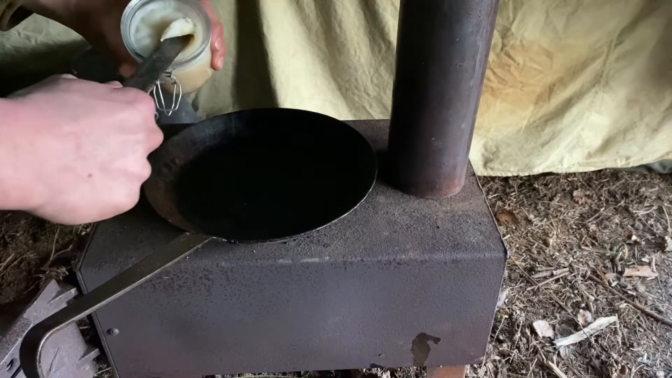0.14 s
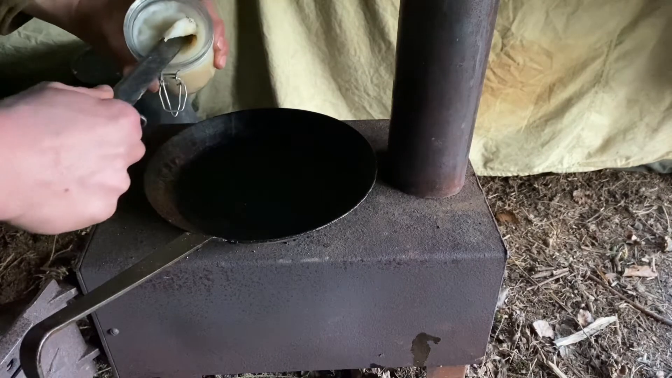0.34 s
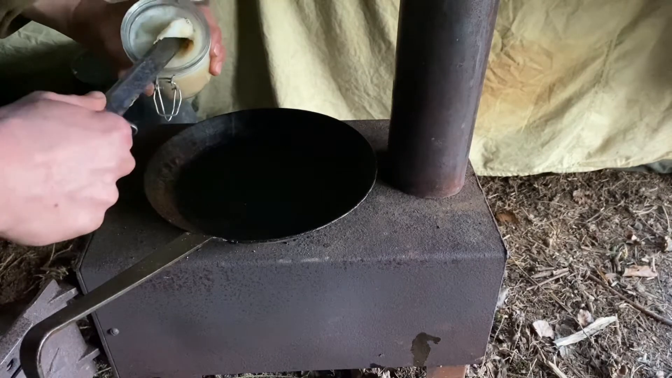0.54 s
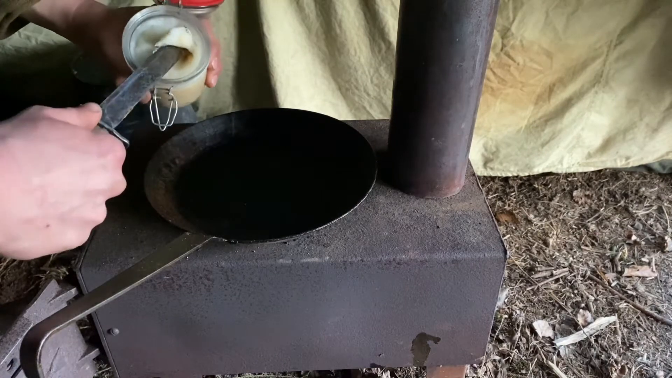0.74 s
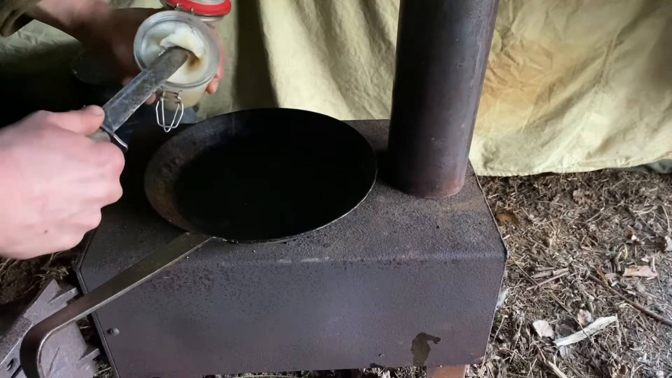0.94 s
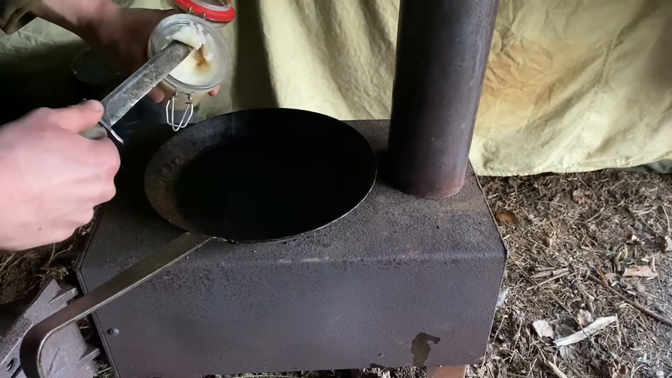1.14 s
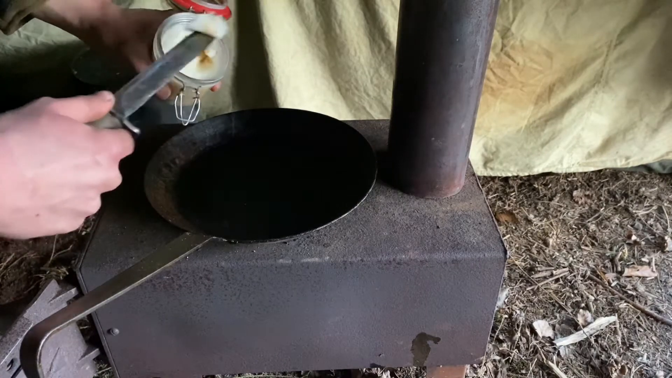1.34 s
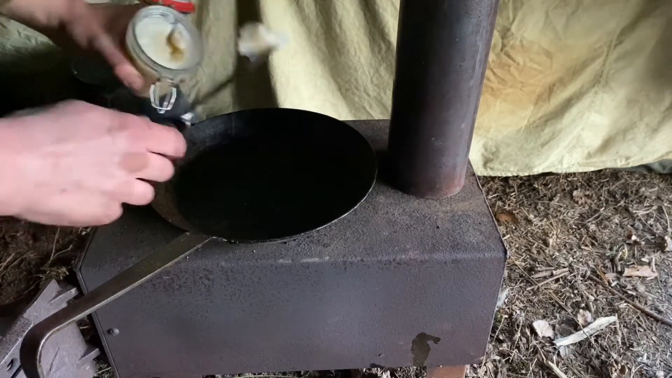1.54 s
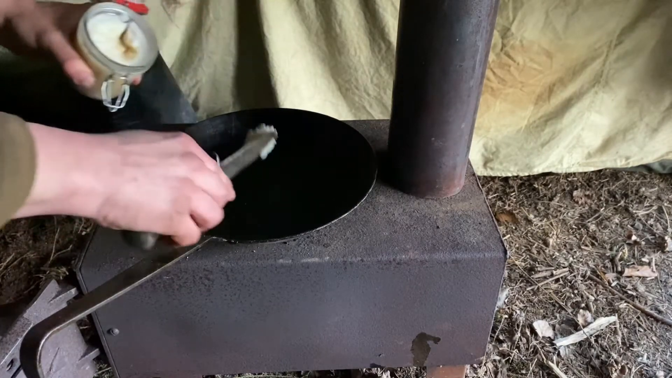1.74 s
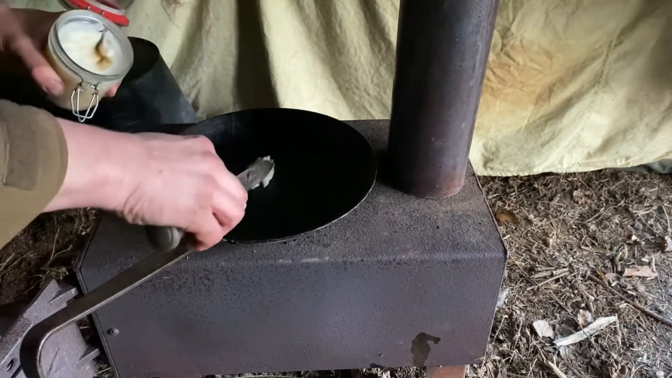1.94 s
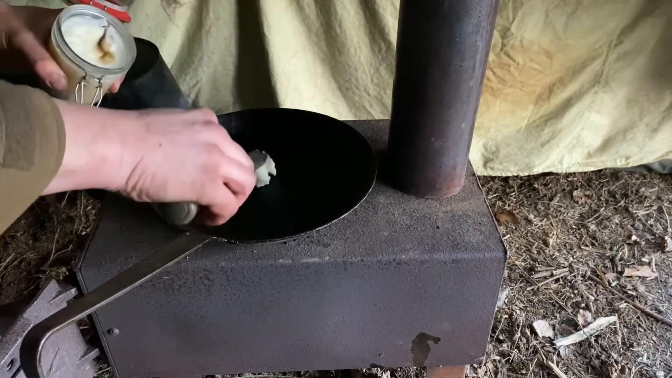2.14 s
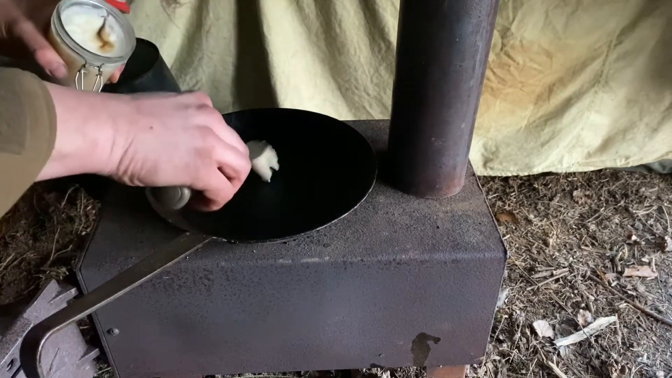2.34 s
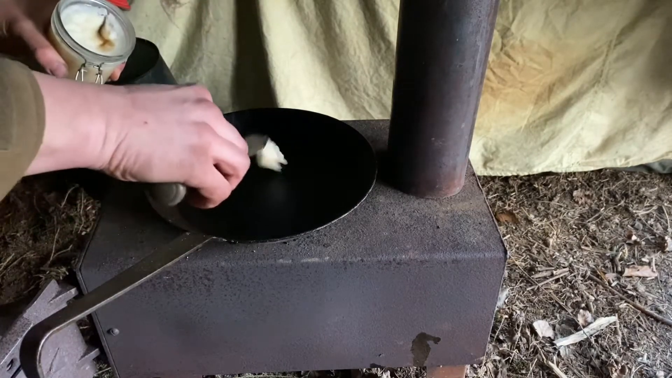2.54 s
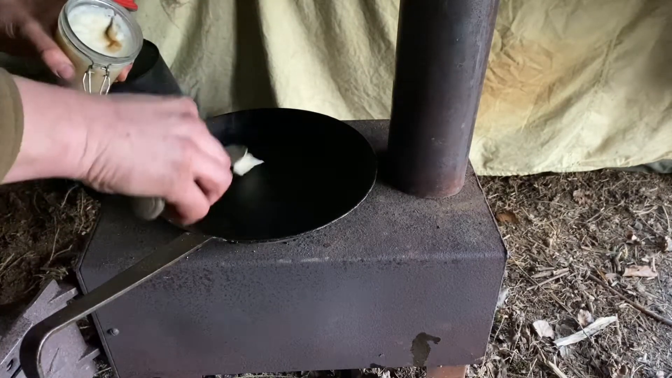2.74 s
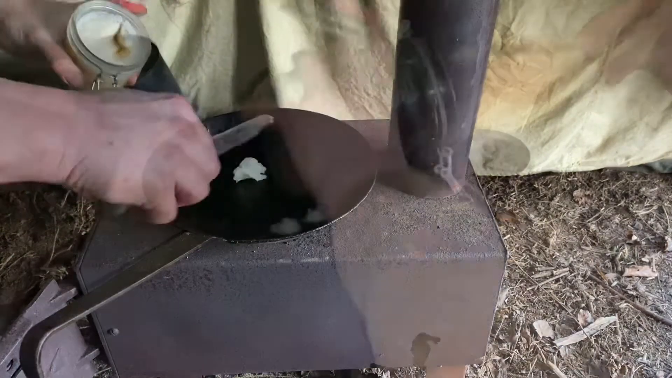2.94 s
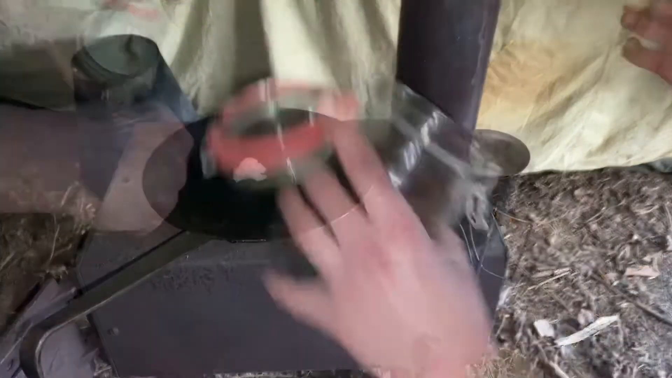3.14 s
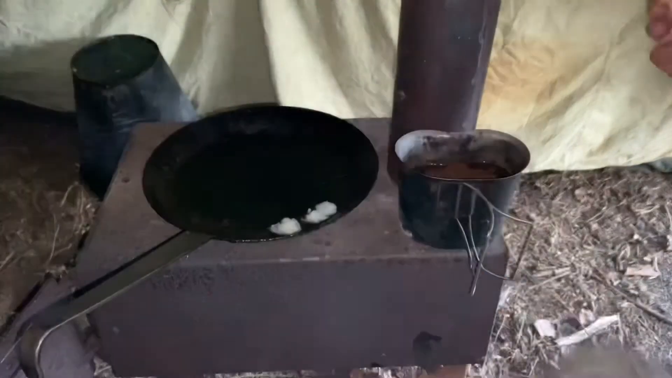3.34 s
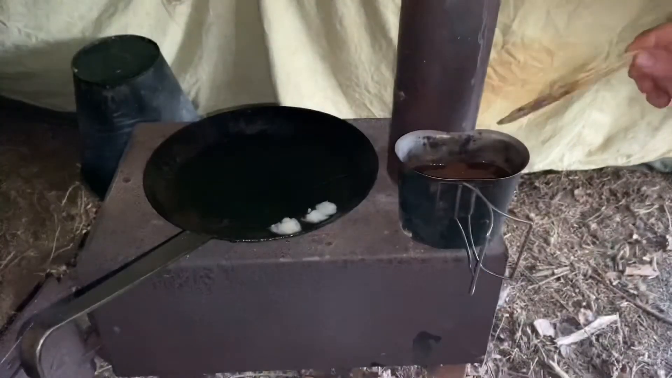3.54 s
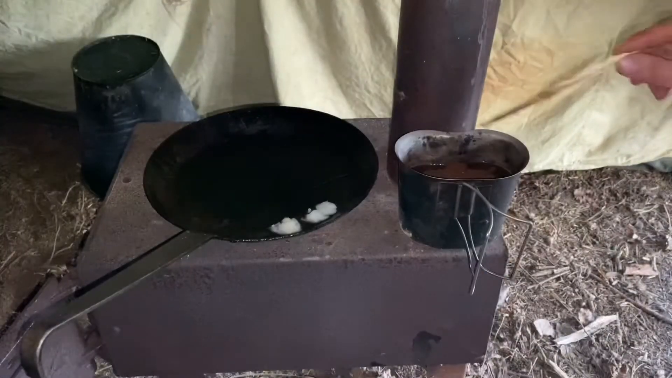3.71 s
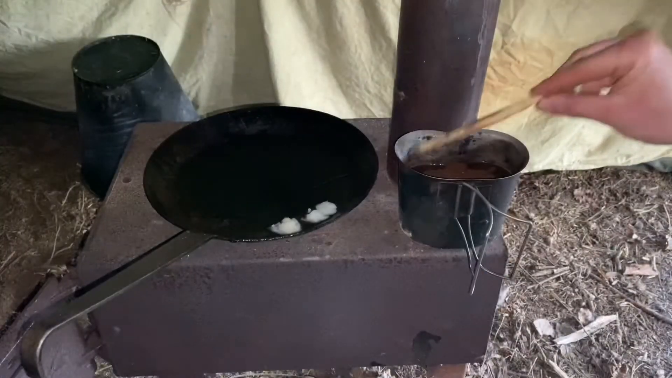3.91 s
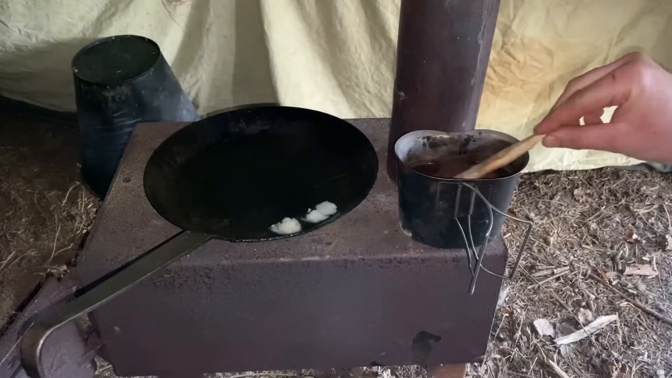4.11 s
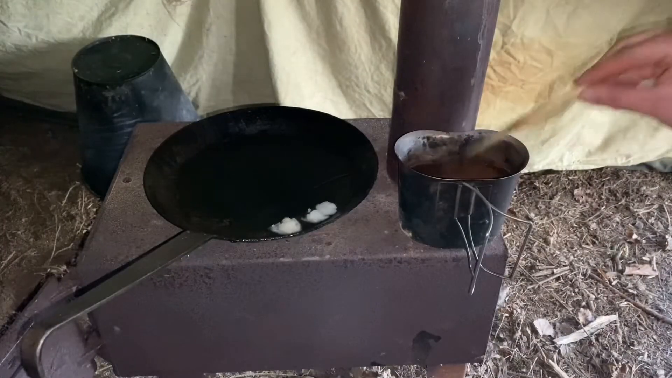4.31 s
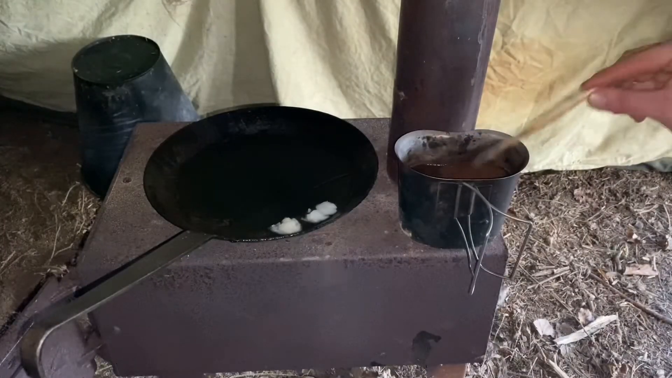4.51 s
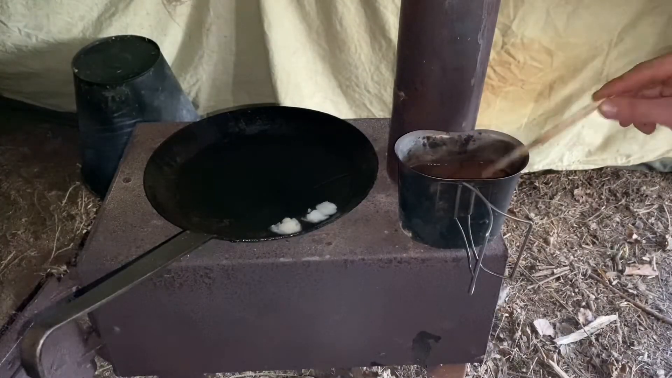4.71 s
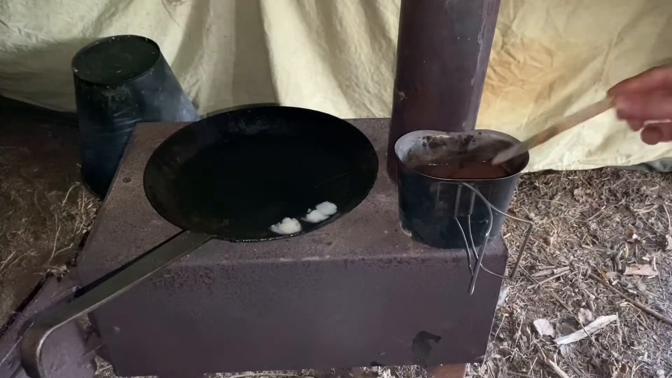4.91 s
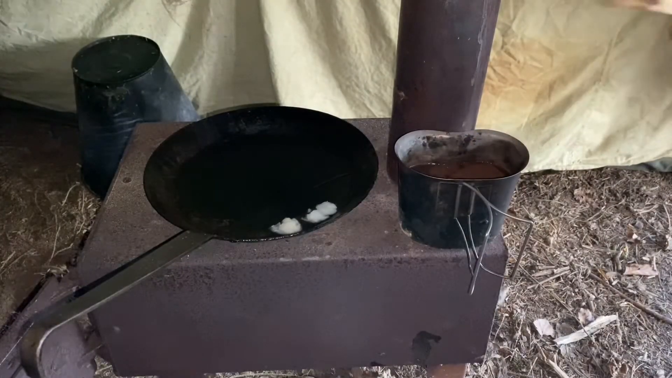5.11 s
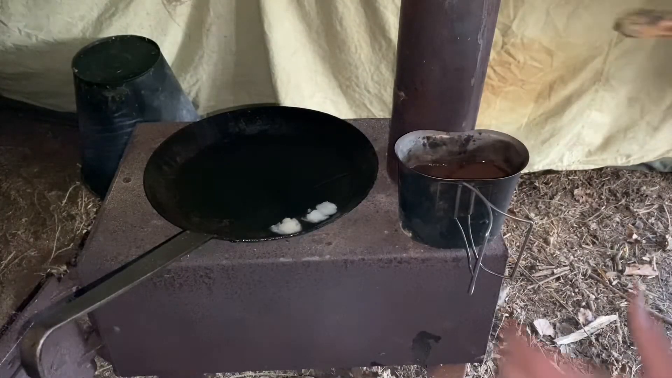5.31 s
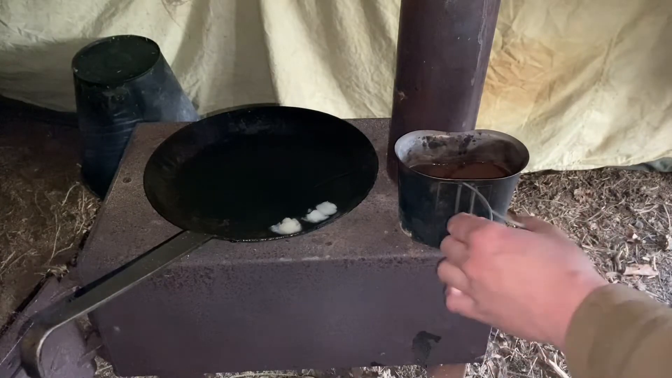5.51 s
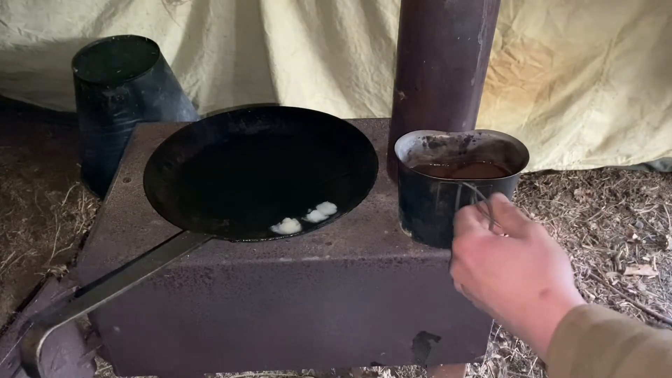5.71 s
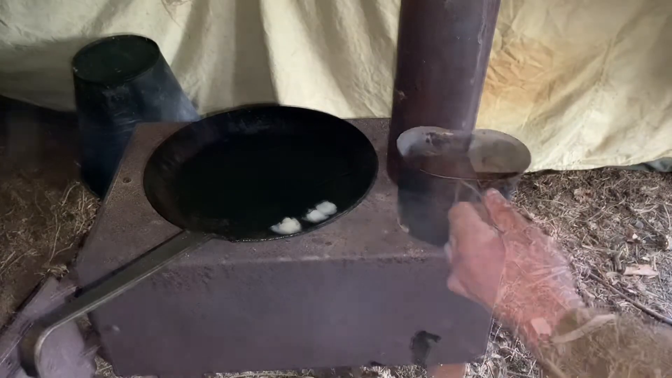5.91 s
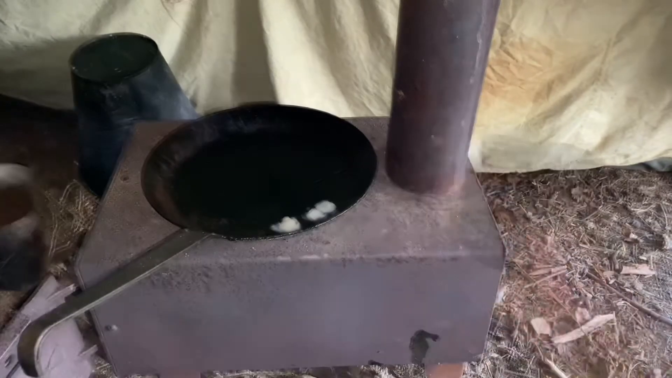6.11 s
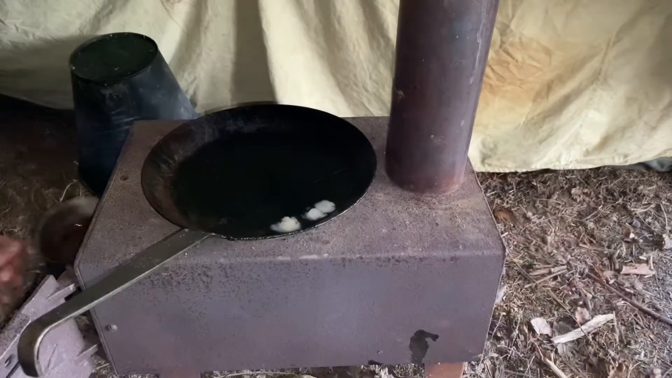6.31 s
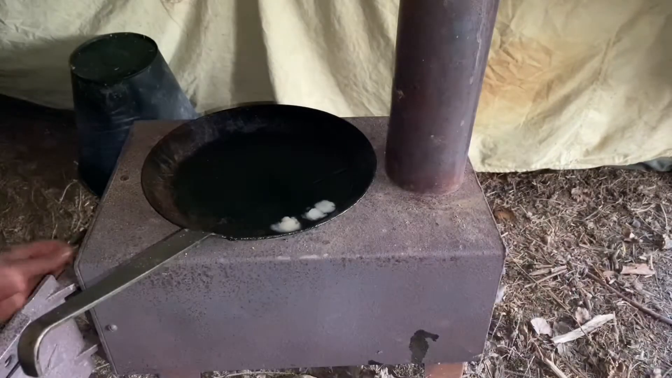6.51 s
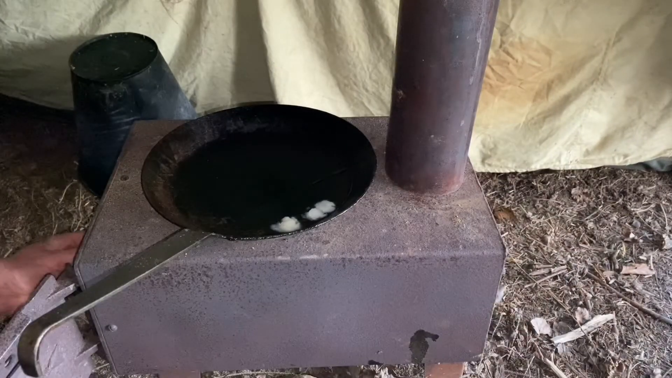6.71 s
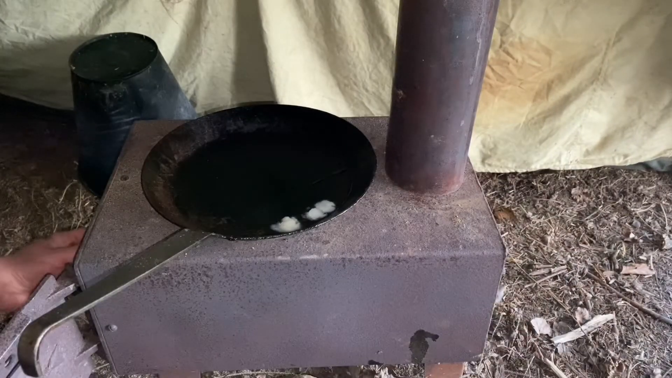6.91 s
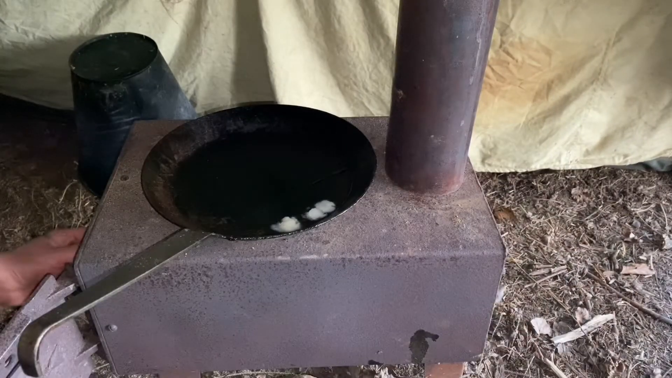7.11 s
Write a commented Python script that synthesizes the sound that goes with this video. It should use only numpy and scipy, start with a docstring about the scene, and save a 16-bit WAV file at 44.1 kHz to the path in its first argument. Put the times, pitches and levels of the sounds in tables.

```python
"""Canvas tent with a sheet-steel stove, someone cooking. Knocks on and near the stove, a spoon on a mug and a jar's
wire clasp ring as damped modes plus noise bursts; things pushed over the steel shake it by stick and slip.
A knife touches a steel pan and scrapes fat into it: struck, then rubbed pan modes. The fire ticks (noise bursts)
and rumbles; sleeves rustle and a thin hiss lies under all (shaped, patchy noise); thin sagging sines whistle faintly."""
import sys
import numpy as np
from scipy import signal
from scipy.fft import rfft, irfft, next_fast_len
from scipy.io import wavfile
from scipy.ndimage import uniform_filter1d, map_coordinates

SR = 44100
rng = np.random.default_rng(int(sys.argv[2]) if len(sys.argv) > 2 else 0)


def inscribe(sig):
    """Save sig as 16-bit PCM at rate SR to the path in sys.argv[1].

    A 1-D sig is mono; a 2-D sig holds one channel per row.
    Samples are clipped to [-1, 1] before scaling.
    """
    pcm = np.round(np.clip(np.atleast_2d(sig).T, -1, 1) * 32767)
    wavfile.write(sys.argv[1], SR, pcm.astype(np.int16))


N = 315393

# Knocks and thuds on and near the stove. Each row: start in seconds, level in dB, pitch in Hz, second mode in Hz,
# stove ring in dB, snap in dB, chatter in seconds, left over right in dB.
KNOCKS = [(0.825, -50, 298, 577, -50, -28, 0.0073, 6), (3.738, -12, 1520, 2800, -34.5, -40.5, 0.0023, 0.5),
          (3.743, -29, 1350, 1060, -19.5, -28.5, 0.0051, -4),
          (3.889, -16, 1345, 2890, -47, -14, 0.0063, -5.5), (3.892, -10, 1945, 4000, -54, -24.5, 0.003, 7),
          (5.533, -29.5, 1500, 2730, -32, -2.5, 0.013, 1), (5.635, -41, 1120, 2550, -27, -9, 0.011, -3),
          (5.648, -35, 930, 656, -17.5, -15, 0.013, -3), (5.667, -37, 730, 2740, -25, -3, 0.01, -3),
          (5.707, -37.5, 1510, 2960, -19.5, -3.5, 0.0084, -2.5),
          (5.76, -35, 236, 163, -31.5, -44.5, 0.0058, -4.5), (5.779, -38.5, 220, 150, -36, -37, 0.0036, -2),
          (6.345, -46.5, 596, 1990, -6, -3.5, 0.0071, 7), (6.368, -19.5, 603, 930, -25.5, -25.5, 0.0051, 2),
          (6.373, -22, 164, 321, -44.5, -52, 0.005, 2), (6.404, -29, 109, 302, -32, -45, 0.004, -0.5),
          (6.409, -35, 600, 1910, -33, -24, .008, -4), (6.492, -36.5, 624, 990, -14.5, -37, 0.01, 3),
          (6.511, -31.5, 266, 89, -23.5, -46.5, .012, 2)]
# Modes of the stove's steel sheets. Each row: frequency in Hz, level in dB, unloaded t60 in seconds.
STOVE_MODES = [(152, -4, 0.3), (165, -0.5, 0.29), (218.2, -4.5, 0.35), (294.6, -10.5, 0.466),
               (411, -6, 0.4), (492, -5, 0.39), (546, -3, 0.34), (594, -4.5, 0.27), (620, -9, 0.51),
               (728, -6, 0.25), (811, -1.5, 0.14), (986, -4, 0.17), (1705, -6, 0.13), (1920, -11, 0.037)]
# Spectrum of the stove's dense wash. Each row: frequency in Hz, relative density in dB per Hz.
WASH_SPECTRUM = [(50, -24), (130, -6), (530, 0.5), (1200, -4), (1600, -14.5), (5000, -30), (11000, -65.5)]
# Decay of that wash. Each row: frequency in Hz, t60 in seconds.
WASH_T60 = [(150, 0.25), (600, 0.21), (1500, 0.17), (4000, 0.087)]
# Modes of the mug. Each row: frequency in Hz, level in dB, t60 in seconds.
MUG_MODES = [(1147, 1.5, 0.38), (1165, 1, 0.23)]
# The stove top left humming. Each row: start in seconds, level in dB, favoured pitch in Hz.
HUMS = [(3.76, -42.5, 562), (6.515, -43, 548)]
# Spoon on the mug's rim. Each row: start in seconds, level in dB.
TAPS = [(4.5772, -18), (4.7885, -17.5)]
# Modes of the wooden spoon. Each row: frequency in Hz, level in dB, t60 in seconds.
SPOON_MODES = [(1104, 1, 0.01), (1830, -12, 0.0077), (3830, -22.5, 0.013)]
# Clasp on jar. Each row: start in seconds, level in dB, belly modes in dB, middle modes in dB, top modes in dB,
# rattle in seconds.
CLINKS = [(2.975, -62, 7, 0, -10, 0.03), (3.052, -43, 14, -4, 14.5, 0.0053), (3.055, -34, 8, 13, 5, 0.0047),
          (3.068, -47, -6, -8, -12.5, 0.004), (3.087, -42.5, -6, -4, -4, 0.013),
          (3.162, -47.5, 6, 0, -16, 0.0058), (3.174, -80, -4, 5, 5, 0.0025), (3.238, -65, 5, 7, -1, 0.0062),
          (3.250, -49.5, -1, 9, 2, 0.036), (3.373, -66.5, 6, 6, -16, 0.027),
          (3.510, -61.5, 6, 9, -5, 0.0084), (4.304, -38.5, -8, 5.5, -1, 0.0087),
          (4.357, -56.5, -12, 0, -10, 0.012), (4.437, -53.5, -8, -2, -14, 0.014),
          (4.469, -61.5, -6.5, -3, -7.5, 0.025)]
# Modes of the jar's glass. Each row: frequency in Hz before detuning, level in dB, t60 in seconds.
GLASS_MODES = [(1519, 2, 0.037), (2640, -22, 0.05), (3800, -2.5, 0.035), (4920, -6.5, 0.015),
               (5130, -7, 0.021), (5350, -5, 0.028), (5650, -10, .015), (7480, -12, 0.01),
               (8400, -3, 0.024), (11230, -2, 0.013)]
# Things pushed over steel. Each row: start in seconds, hold in seconds, release t60 in seconds, body in dB,
# grit in dB, singing against the grit in dB.
SLIDES = [(3.74, 0.013, 0.12, -60, -50, -18), (3.783, 0.0068, 0.029, -72, -52, -27),
          (5.621, 0.025, 0.3, -57, -53.5, -27), (5.793, 0.0093, 0.15, -62.5, -64.5, -14),
          (6.346, 0.019, 0.34, -45, -48.5, -18), (6.401, 0.05, 0.36, -51, -63.5, 5.5),
          (6.634, 0.041, 0.1, -68, -71.5, -20)]
# Spectrum of the grating. Each row: frequency in Hz, relative density in dB per Hz.
GRIT_SPECTRUM = [(1000, -26.5), (1900, -2), (2600, -2), (4000, -12), (8000, -11), (13000, -6.5),
                 (16500, -35.5)]
# Singing modes of the scraped steel. Each row: frequency in Hz, level in dB.
SCRAPED_MODES = [(1740, -0.5), (1985, -4.5), (2450, -9.5)]
# Knife on pan. Each row: start in seconds, level in dB, brightness in dB per octave, scrape in seconds.
TOUCHES = [(1.725, -71, 5, 0.02), (1.985, -72, 1, 0.034), (2.294, -68.5, -1, 0.006),
           (2.636, -64.5, 3, 0.008)]
# The blade dragged over the pan. Each row: start in seconds, length in seconds, level in dB.
STROKES = [(1.748, 0.23, -74.5), (2.02, 0.17, -80)]
# Modes of the steel pan. Each row: frequency in Hz, level in dB, t60 in seconds.
PAN_MODES = [(400, 6, 0.08), (577, 8, 0.21), (1060, -9, 0.14), (1660, -14.5, 0.39), (2030, -23, 0.22),
             (4690, -17.5, 0.4)]
# Ticks of the fire. Each row: start in seconds, level in dB, centre in Hz.
TICKS = [(0.317, -52.5, 10700), (0.468, -53, 7500), (0.5706, -52, 10800), (0.6989, -44, 10400),
         (0.7396, -46, 11900), (0.782, -53.5, 11900), (1.0249, -38, 7700), (1.1746, -36, 9200),
         (1.509, -48, 10600), (1.615, -53.5, 3280), (1.836, -48.5, 7500), (2.8431, -45, 11400),
         (3.437, -53, 11260), (4.6718, -46.5, 11230), (4.9073, -47, 4080), (5.1256, -42.5, 10700),
         (6.6118, -56, 4140), (6.641, -53, 11200), (6.942, -52.5, 11800), (7.07, -61.5, 9000)]
# Faint falling whistles. Each row: start in seconds, length in seconds, starting pitch in Hz, level in dB.
WHISTLES = [(0.0, 0.11, 5270, -76.5), (0.105, 0.077, 5180, -77), (.17, .12, 5200, -77)]
# Sleeves sweeping past. Each row: loudest moment in seconds, seconds to rise 10 dB, seconds to fall 10 dB,
# rustle in dB, its treble in dB.
SWISHES = [(0.2, 3, 0.6, -70.5, -76.5), (1.9, 1.25, 1.1, -76, -86), (3.05, 0.07, 0.17, -70.5, -80),
           (3.711, 0.21, 0.02, -62.5, -71), (4.171, 0.4, 0.46, -69.5, -75.5),
           (5.24, 0.21, .5, -62.5, -66.5), (5.921, -0.15, 0.55, -67, -73.5)]
# Spectrum of cloth. Each row: frequency in Hz, relative density in dB per Hz.
RUSTLE_SPECTRUM = [(760, -33), (1300, -8), (1620, -3), (3000, -1), (4590, -4), (5510, -4), (8000, -17.5),
                   (10400, -40.5), (17600, -120)]
# Low noise over time. Each row: time in seconds, rumble of the fire in dB, low-mid murmur that swells after
# blows on the stove in dB.
LOW_NOISE_LEVELS = [(0.0, -69, -73.5), (0.52, -67, -78.5), (3.34, -66, -79), (3.76, -61.5, -63.5),
                    (4.22, -64, -75), (4.62, -63.5, -73.5), (4.74, -60, -66.5), (5.34, -63, -71.5),
                    (5.65, -62, -65), (6.15, -67, -71.5), (6.57, -57, -70), (6.76, -63, -80),
                    (7.15, -69, -79)]
# Spectrum of the fire's draught. Each row: frequency in Hz, relative density in dB per Hz.
RUMBLE_SPECTRUM = [(22, -45.5), (33, -25), (45, -0.5), (59, -1), (100, -4.5), (130, -10), (300, -23.5),
                   (500, -49.5)]
# Spectrum of the low-mid murmur. Each row: frequency in Hz, relative density in dB per Hz.
MURMUR_SPECTRUM = [(120, -33.5), (250, 2), (500, 2), (1000, -7), (1800, -13), (3000, -43)]
# Level of the hiss over time, rising and falling. Each row: time in seconds, level in dB.
HISS_LEVELS = [(0, -71), (1.35, -72.5), (2.7, -70.5), (3.2, -79), (3.95, -75), (4.62, -89.5), (4.86, -67.5),
               (6.25, -78.5), (6.55, -85), (7.15, -86)]
# Spectrum of the hiss. Each row: frequency in Hz, relative density in dB per Hz.
HISS_SPECTRUM = [(2500, -25), (4000, 0), (6000, -5), (8000, 2.5), (11000, 3.5), (14000, 2), (15700, -5.5),
                 (16100, -38.5)]
# Stereo likeness of the noises. Each row: frequency in Hz, left-right correlation.
ALIKE = [(60, 1), (200, 0.76), (500, 0.267), (1200, 0.026), (2500, 0.3), (4000, 0.56), (6000, 0.14),
         (7000, 1), (16000, 0.98)]
# Lean of the noises. Each row: frequency in Hz, left over right in dB.
LEFT_LEAN = [(60, 1), (150, -0.5), (380, 3.5), (950, 0.5), (2380, 5), (5980, 2), (15000, -1.5)]
# Answer of the canvas walls. Each row: frequency in Hz, t60 in seconds.
TENT_T60 = [(300, 0.036), (2000, 0.068), (10000, 0.048)]
# Phase between left and right in the treble, in steps. Each row: frequency in Hz, phase in turns.
STEREO_PHASE = [(0, 0), (7500, 0), (8600, .5), (9500, .5), (10600, 1), (11600, 1), (12800, 1.5),
                (13700, 1.5), (14700, 2), (16500, 2)]

KNOCK_T60_S, DEEPER_LONGER = 0.013, 0.63  # at 1 kHz; power by which deep knocks last longer
OVERTONE_DB = -3.5  # a knocked thing's second mode
MUG_UNDER_STOVE_DB = 23.5  # the mug hums along when the stove is shaken
HUM_FALL_DB_PER_OCTAVE = 70  # loss away from the favoured pitch
TAP_STOVE_DB, TAP_MUG_DB, TAP_SNAP_DB, TAP_PAN_DB = -24.5, -30, -13.5, 2.5
JAR_PAN_DB = 2.5
CLINK_DETUNE = 0.005  # relative; small random detuning of the glass modes at each clink
GRIP_S = 0.017  # a push takes hold
WHISTLE_SAG_HZ_PER_S = 2600
CLOTH_DB = -93.5  # the canvas never rests
TOP_HZ = 16600


def amp(db):
    """Decibels to gain."""
    return 10 ** (np.asarray(db) / 20)


def unit(x):
    """Scaled to rms 1."""
    return x / np.sqrt(np.mean(x ** 2) + 1e-20)


def along(points, hz):
    """Interpolates (Hz, value) points on a log axis."""
    point_hz, values = np.transpose(points)
    return np.interp(np.log(hz + 1), np.log(point_hz + 1), values)


def curves(rows):
    """One value per sample for each column after the time."""
    time_s, *columns = np.transpose(rows)
    return [np.interp(np.arange(N) / SR, time_s, column) for column in columns]


def wobble(rate_hz):
    """A smooth random curve with rate_hz knots a second."""
    knots = rng.standard_normal(int(N * rate_hz / SR) + 4)
    return map_coordinates(knots, [np.arange(N) * rate_hz / SR])


def filtered(x, response):
    """x times a complex response of frequency."""
    n = x.shape[-1]
    size = next_fast_len(n + 8192)
    return irfft(rfft(x, size) * response(np.fft.rfftfreq(size, 1 / SR)), size)[..., :n]


def rush(spectrum, patchy_db):
    """Stereo noise of rms 1 with time-frequency patches of random gain."""
    z = signal.stft(rng.standard_normal((2, N)), nperseg=512)[2]
    patches = uniform_filter1d(rng.standard_normal(z.shape[1:]), size=6, axis=0)
    patches = uniform_filter1d(patches, size=12, axis=1)
    pair = signal.istft(z * amp(patchy_db * unit(patches)), nperseg=512)[1][:, :N]

    def mid_side(hz):
        turn = np.arccos(np.clip(along(ALIKE, hz), -1, 1)) / 2  # sets the left-right correlation
        return amp(along(spectrum, hz)) * [np.cos(turn), np.sin(turn)]

    mid, side = filtered(pair, mid_side)
    lean = lambda hz: amp(np.outer([0.5, -0.5], along(LEFT_LEAN, hz)))
    return unit(filtered(np.array([mid + side, mid - side]), lean))


def dying(t60s):
    """Two noises in which each frequency dies at its own speed, first one scaled to energy 1."""
    hz, t, z = signal.stft(rng.standard_normal((2, SR // 2)), SR, nperseg=256)
    decay = amp(-60 * t / along(t60s, hz)[:, None])
    tail = signal.istft(z * decay, SR, nperseg=256)[1][:, :SR // 2]
    return tail / np.linalg.norm(tail[0])


def level(hz):
    """A blow that favours no mode."""
    return 0


def ring(modes, tilt, scatter_db, attack_s):
    """A struck body: damped sines at scattered strengths; tilt(hz) is the blow's colour in dB."""
    t = np.arange(SR // 2) / SR
    hz, db, t60_s = np.transpose(modes)[:, :, None]
    mode_db = db + tilt(hz) + scatter_db * rng.standard_normal(hz.shape)
    sign = rng.choice([-1, 1], hz.shape)
    sines = sign * amp(mode_db - 60 * t / t60_s) * np.sin(2 * np.pi * hz * t)
    return np.sum(sines, axis=0) * (1 - np.exp(-t / attack_s))


def crack(hz, width, t60_s):
    """A decaying noise burst through one broad resonance, peak 1; width is relative to hz."""
    burst = rng.standard_normal(SR // 2) * amp(-60 * np.arange(SR // 2) / SR / t60_s)
    burst = filtered(burst, lambda f: 1j * f * width * hz / (hz * hz - f * f + 1j * f * width * hz))
    return burst / np.abs(burst).max()


def rattled(sound, length_s, chance=None):
    """The sound set off by a first contact and weaker uneven ones; the contacts have energy 1."""
    if chance is None:
        chance = rng.standard_normal(SR // 10)
    left = np.clip(1 - np.arange(SR // 10) / SR / length_s, 0, 1)
    contacts = left ** 0.6 * chance ** 3
    # the shorter the rattle, the more lies in the first blow
    contacts[0] = np.linalg.norm(contacts) * 0.01 / length_s
    return signal.fftconvolve(sound, contacts / np.linalg.norm(contacts))[:len(sound)]


def silence():
    """An empty stereo mix with room for the last tails."""
    return np.zeros((2, N + SR))


def add(mix, start_s, sound, pan_db, wet_db):
    """Places a sound with its own decaying answer from the canvas walls, 4 ms late."""
    late = np.pad(dying(TENT_T60), ((0, 0), (SR // 250, 0)))
    answer = signal.fftconvolve(np.atleast_2d(sound), late, axes=1)[:, :SR // 2]
    placed = (sound + amp(wet_db) * answer) * amp([[pan_db / 2], [-pan_db / 2]])
    mix[:, round(start_s * SR):][:, :SR // 2] += placed


def knock(modes, stove_db, mug_db, snap_db):
    """A blow: the struck thing's own modes, a snap, and the stove and mug that it shakes."""
    hz, _, t60_s = modes[0]
    struck = ring(modes, level, scatter_db=0.5, attack_s=1.3 / hz)  # a soft contact swells over a cycle or two
    struck += amp(-15.5) * crack(0.7 * hz, 0.2, 3 * t60_s)
    wash = filtered(dying(WASH_T60), lambda f: amp(along(WASH_SPECTRUM, f)))  # modes too dense to tell apart
    wash = 0.48 * wash.mean(axis=0) + 0.44 * wash
    wash = wash * (1 - np.exp(-np.arange(SR // 2) / SR / 0.002))
    stove = ring(STOVE_MODES, level, scatter_db=0.0, attack_s=0.019)  # the big sheets answer late
    stove = stove + amp(10.5) * wash / np.abs(wash).max()
    mug = ring(MUG_MODES, level, scatter_db=0.5, attack_s=0.0013)
    snap = crack(8200, 0.36, 1.3 * t60_s)
    return struck + amp(stove_db) * stove + amp(mug_db) * mug + amp(snap_db) * snap


def knocks():
    """Two damped modes, deeper ones longer, that shake stove and mug; contacts chatter alike on both sides."""
    mix = silence()
    for start_s, db, hz, second_hz, stove_db, snap_db, chatter_s, pan_db in KNOCKS:
        t60_s = KNOCK_T60_S * (1000 / hz) ** DEEPER_LONGER
        modes = [(hz, 0, t60_s), (second_hz, OVERTONE_DB, t60_s)]
        blow = knock(modes, stove_db, stove_db - MUG_UNDER_STOVE_DB, snap_db)
        chance = rng.standard_normal(SR // 10)
        chattered = np.array([rattled(side, chatter_s, chance) for side in blow])
        add(mix, start_s, amp(db) * chattered, pan_db, wet_db=-11.0)
    return mix[:, :N]


def hums():
    """Stove modes near a favoured pitch ring on."""
    mix = silence()
    for start_s, db, hz in HUMS:
        tilt = lambda f: -HUM_FALL_DB_PER_OCTAVE * np.abs(np.log2(f / hz))
        hum = ring(STOVE_MODES, tilt, scatter_db=2.5, attack_s=0.01)
        add(mix, start_s, amp(db) * hum, pan_db=1.5, wet_db=-9)
    return mix[:, :N]


def taps():
    """The spoon's short modes, with the mug and the stove below it shaken."""
    mix = silence()
    for start_s, db in TAPS:
        tap = knock(SPOON_MODES, TAP_STOVE_DB, TAP_MUG_DB, TAP_SNAP_DB)
        add(mix, start_s, amp(db) * tap, TAP_PAN_DB, wet_db=-11.0)
    return mix[:, :N]


def clinks():
    """Wire rattling on glass: detuned jar modes, contact noise in three bands and a dull body."""
    mix = silence()
    for start_s, db, belly_db, middle_db, top_db, rattle_s in CLINKS:
        band_db = [0, belly_db, middle_db, middle_db, top_db]
        tilt = lambda hz: np.interp(hz, [2000, 4200, 4500, 6300, 7000], band_db)
        detuned = [(hz * (1 + CLINK_DETUNE * rng.standard_normal()), mode_db, t60_s)
                   for hz, mode_db, t60_s in GLASS_MODES]
        clink = ring(detuned, tilt, scatter_db=2, attack_s=0.0005)
        clink += amp(top_db + 5.5) * crack(12000, 0.33, 0.034)
        clink += amp(middle_db - 6.0) * crack(5200, 0.8, 0.014)
        clink += amp(-6.5) * crack(3300, 1.0, 0.018)
        clink += amp(-9.5) * crack(420, 1.5, 0.062)  # the jar's dull body
        add(mix, start_s, amp(db) * rattled(clink, rattle_s), JAR_PAN_DB, wet_db=-8)
    return mix[:, :N]


def slides():
    """Stick and slip: uneven lumps of friction shake the stove's sheets and grate on its surface."""
    lumps = wobble(90)
    push = unit(amp(3 * lumps) * rng.standard_normal(N))
    grit = unit(amp(2.2 * lumps) * rush(GRIT_SPECTRUM, patchy_db=2.5))
    thrum = unit(amp(2.7 * lumps) * rush(WASH_SPECTRUM, patchy_db=-1.0))
    shake, grate, sing = np.zeros((3, N))
    t = np.arange(N) / SR
    for start_s, hold_s, t60_s, body_db, grit_db, sing_db in SLIDES:
        grip = np.clip((t - start_s) / GRIP_S, 0, 1) ** 2
        force = grip * amp(-60 * np.maximum(t - start_s - GRIP_S - hold_s, 0) / t60_s)
        shake = np.hypot(shake, amp(body_db) * force)
        grate = np.hypot(grate, amp(grit_db) * force)
        sing = np.hypot(sing, amp(grit_db + sing_db) * force)
    # damped by the weight that rests on the sheet
    loaded = [(hz, db, 0.22 * t60_s) for hz, db, t60_s in STOVE_MODES]
    sheets = ring(loaded, level, scatter_db=5.5, attack_s=0.00012)
    song = ring([(hz, db, 0.05) for hz, db in SCRAPED_MODES], level, scatter_db=4.5, attack_s=0.00035)
    body = signal.fftconvolve(shake * push, sheets / np.linalg.norm(sheets))[:N]
    body += signal.fftconvolve(sing * push, song / np.linalg.norm(song))[:N]
    return body * amp([[1.5], [-1.5]]) + amp(-3.0) * shake * thrum + grate * grit


def touches():
    """Knife on pan: pan modes and a low burst, set off by scraping contacts."""
    mix = silence()
    for start_s, db, bright_db, scrape_s in TOUCHES:
        tilt = lambda f: bright_db * np.log2(f / 600)
        pan = ring(PAN_MODES, tilt, scatter_db=1.5, attack_s=0.0005)
        pan += amp(7) * crack(500, 1.5, 0.04)
        add(mix, start_s, amp(db) * rattled(pan, scrape_s), pan_db=1.5, wet_db=-9)
    return mix[:, :N]


def swell(start_s, length_s):
    """A soft-edged window."""
    return np.sin(np.pi * np.clip((np.arange(N) / SR - start_s) / length_s, 0, 1)) ** 0.5


def strokes():
    """Uneven friction of the blade keeps the pan's modes alive."""
    pan = ring(PAN_MODES, level, scatter_db=1.5, attack_s=0.0005)
    friction = unit(amp(6.1 * wobble(67)) * rng.standard_normal(N))
    rub = sum(amp(db) * swell(start_s, length_s) for start_s, length_s, db in STROKES) * friction
    return signal.fftconvolve(rub, pan / np.linalg.norm(pan))[:N]


def ticks():
    """Short broad-band bursts from the fire."""
    mix = silence()
    for start_s, db, hz in TICKS:
        add(mix, start_s, amp(db) * crack(hz, 2.1, 0.023), pan_db=3.5, wet_db=-5.0)
    return mix[:, :N]


def whistles():
    """Thin wavering tones that each sag in pitch."""
    t = np.arange(N) / SR
    waver_hz = 30 * wobble(40)
    total = np.zeros(N)
    for start_s, length_s, hz, db in WHISTLES:
        pitch_hz = hz - WHISTLE_SAG_HZ_PER_S * np.clip(t - start_s, 0, length_s) + waver_hz
        tone = np.sqrt(2) * np.sin(2 * np.pi * np.cumsum(pitch_hz) / SR)
        total += amp(db) * swell(start_s, length_s) * tone
    return total


def cloth_and_hiss():
    """Rubbed cloth as patchy noise over a constant floor; each sleeve also lifts the thin hiss."""
    t = np.arange(N) / SR
    (hiss_db,) = curves(HISS_LEVELS)
    cloth, treble = amp(CLOTH_DB), amp(hiss_db)
    for peak_s, rise_s, fall_s, db, treble_db in SWISHES:
        swell_db = -10 * ((t - peak_s) / np.where(t < peak_s, rise_s, fall_s)) ** 2
        cloth = np.hypot(cloth, amp(db + swell_db))
        treble = np.hypot(treble, amp(treble_db + swell_db))
    rustle = cloth * amp(0.59 * wobble(29)) * rush(RUSTLE_SPECTRUM, patchy_db=3.0)
    return rustle + treble * rush(HISS_SPECTRUM, patchy_db=3.5)


def draught_and_murmur():
    """Wavering low noise: the fire's draught in the flue and a low-mid murmur that swells after blows on the stove."""
    rumble_db, murmur_db = curves(LOW_NOISE_LEVELS)
    rumble = amp(rumble_db + 1.2 * wobble(9)) * rush(RUMBLE_SPECTRUM, patchy_db=1.2)
    murmur = amp(murmur_db + 2.1 * wobble(4.2)) * rush(MURMUR_SPECTRUM, patchy_db=3.5)
    return rumble + murmur


def scene():
    """All sources together in stereo."""
    stove_side = knocks() + hums() + taps() + clinks() + slides()
    pan = touches() + strokes()
    background = ticks() + whistles() + cloth_and_hiss() + draught_and_murmur()
    return stove_side + pan + background


def record(dry):
    """Left and right differ in phase in the treble; nothing is kept above the band limit."""
    phase = lambda hz: np.exp(1j * np.pi * np.outer([-1, 1], along(STEREO_PHASE, hz)))
    return filtered(dry, lambda hz: phase(hz) * (hz < TOP_HZ))


dry = scene()
out = record(dry)
inscribe(out)
```